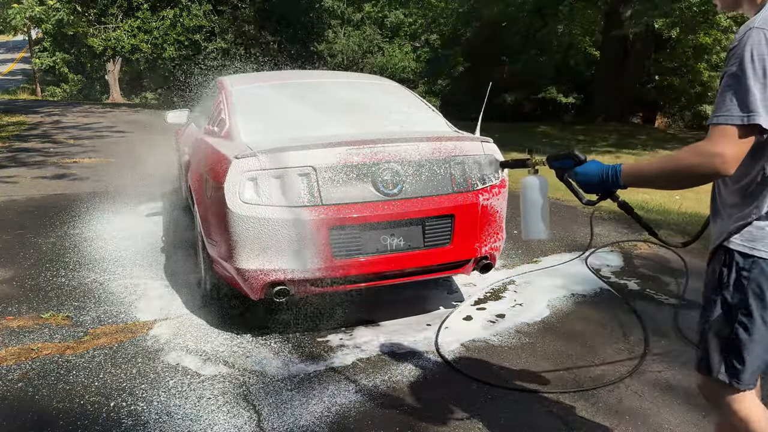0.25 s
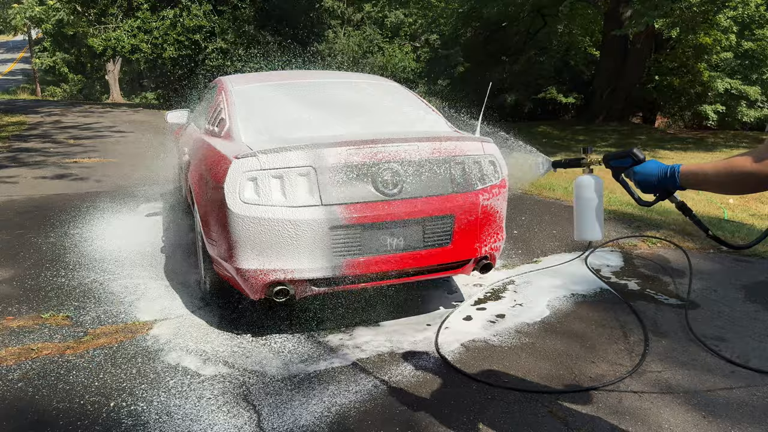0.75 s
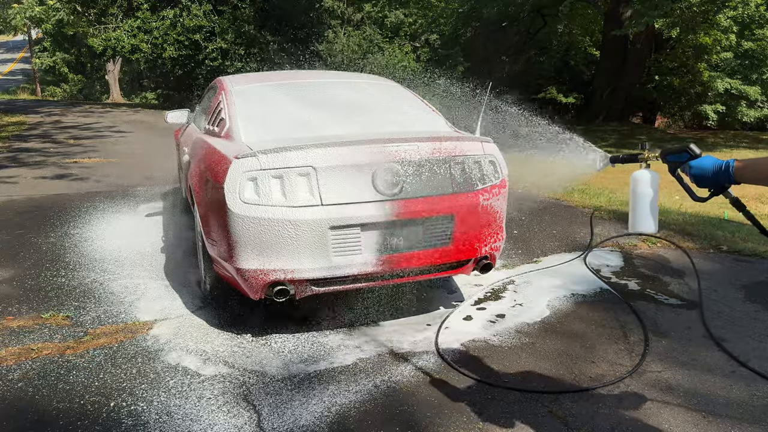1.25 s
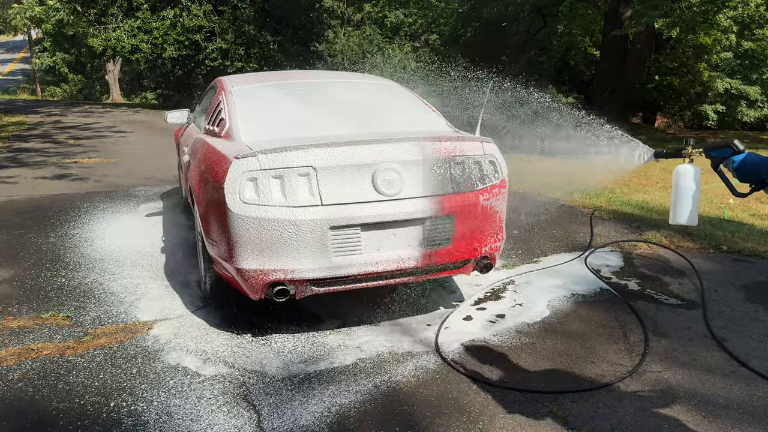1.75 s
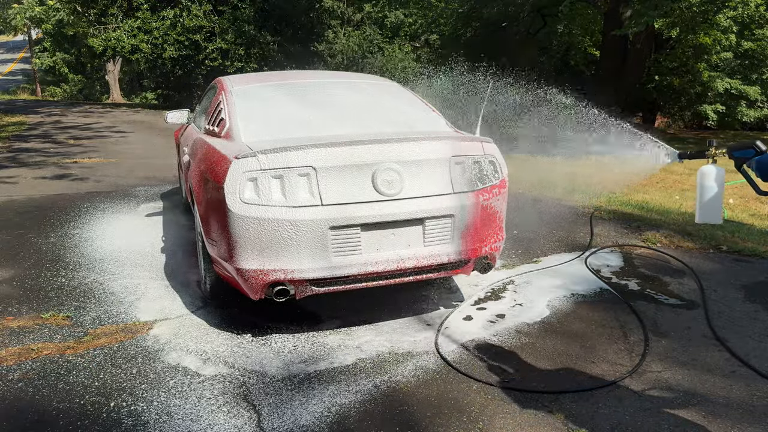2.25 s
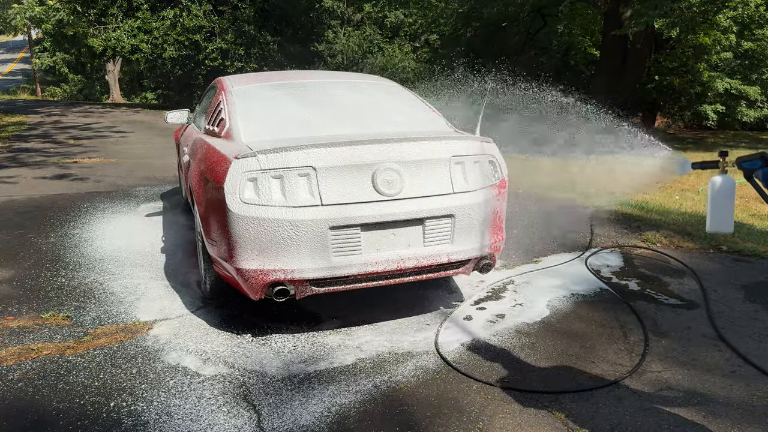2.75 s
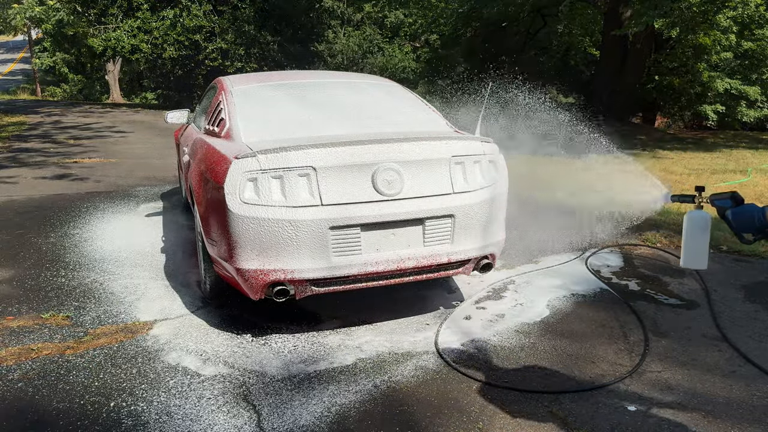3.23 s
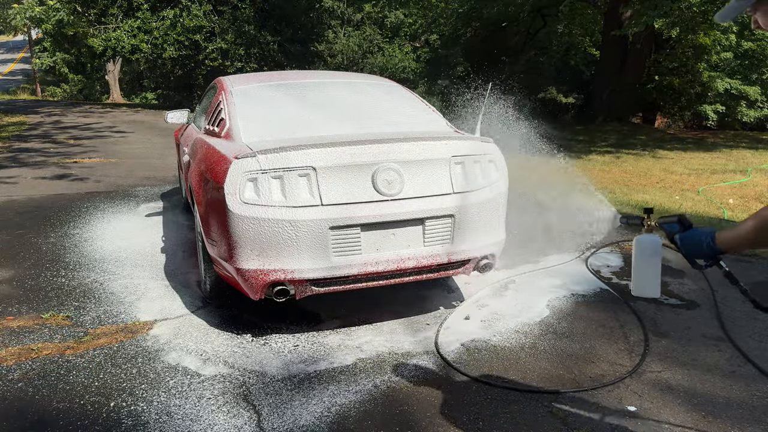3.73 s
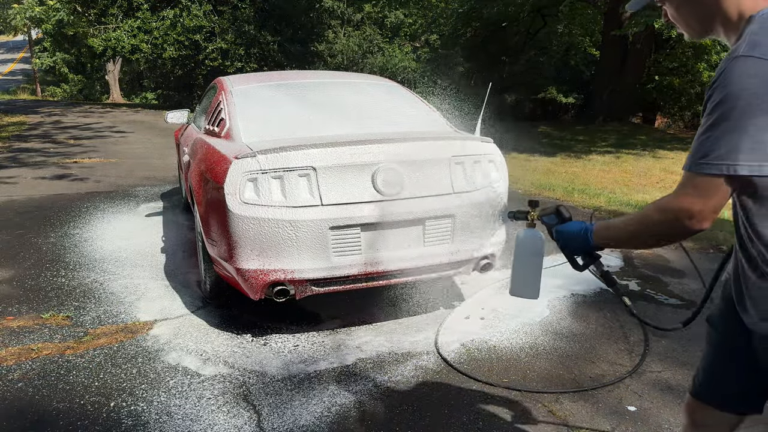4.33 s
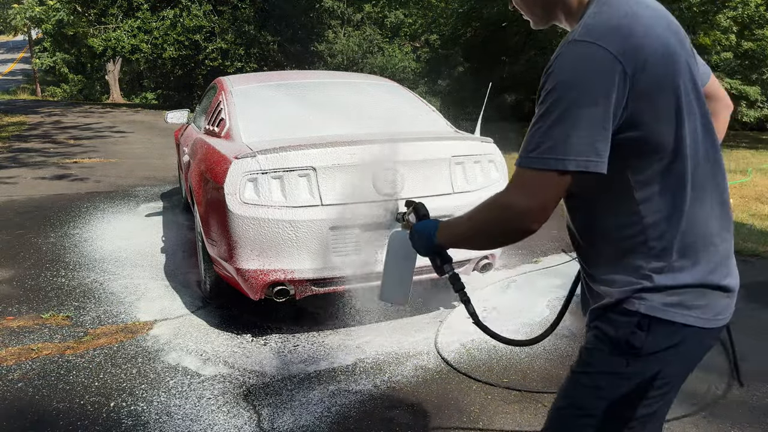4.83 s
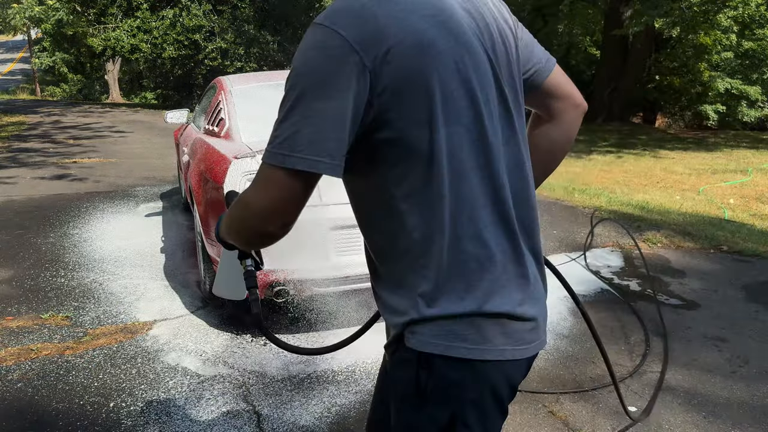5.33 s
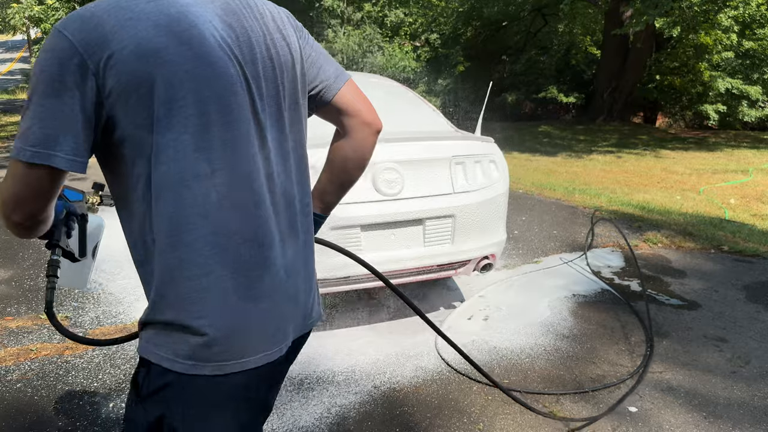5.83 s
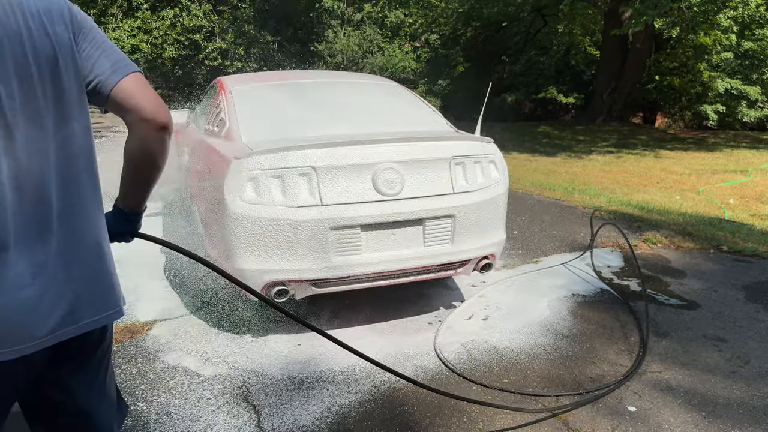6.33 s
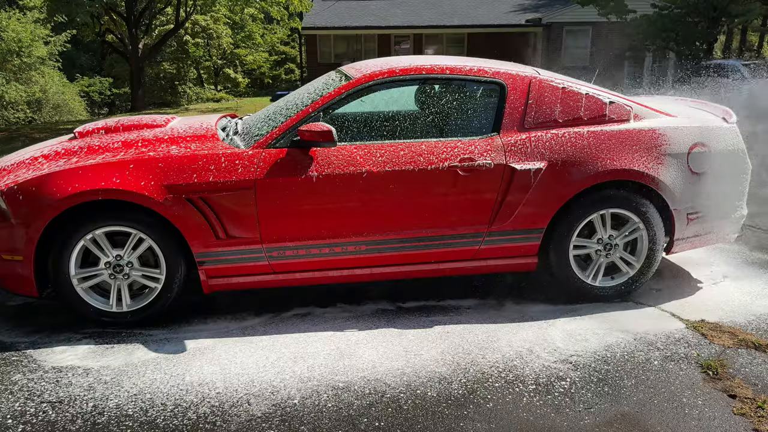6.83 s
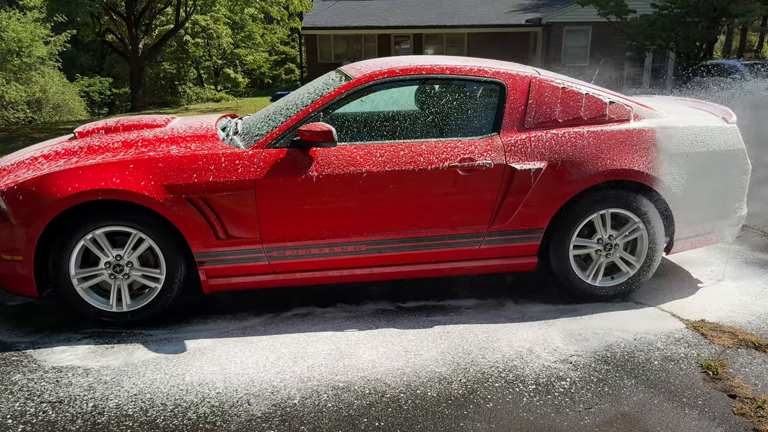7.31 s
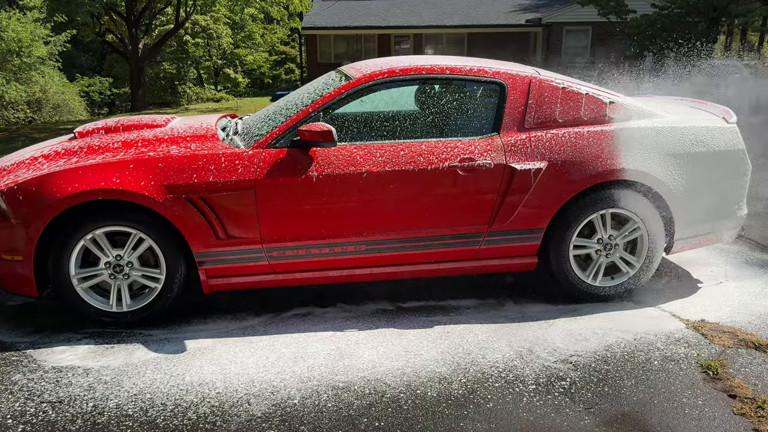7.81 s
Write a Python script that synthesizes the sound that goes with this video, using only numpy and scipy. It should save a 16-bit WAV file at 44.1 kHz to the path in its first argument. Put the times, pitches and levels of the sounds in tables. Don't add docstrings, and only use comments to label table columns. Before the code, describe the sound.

On an open driveway, a foam lance roars and hisses without pause, foam spattering and fizzing on a car's panels. A small petrol pump engine drones and rattles steadily behind. The hiss brightens, then dulls as the operator crosses from right to left past a two-port microphone; rubber hose slaps the ground softly, then the view cuts to a farther spot with a quieter engine and brighter swells of spray.

```python
import sys
import numpy as np
from scipy import signal
from scipy.fft import rfft, irfft, next_fast_len
from scipy.io import wavfile
from scipy.ndimage import uniform_filter1d, map_coordinates

SR = 44100
rng = np.random.default_rng(int(sys.argv[2]) if len(sys.argv) > 2 else 0)


def store_pcm(level_fs):
    pcm = np.round(np.clip(level_fs, -1, 1) * 32767).astype(np.int16)
    wavfile.write(sys.argv[1], SR, np.atleast_2d(pcm).T)


def linear_from_db(decibels):
    return 10 ** (np.asarray(decibels, float) / 20)


N = 355887

JUMP_S = 6.763
FIRING_HZ = 27.94
TOP_HZ = 15850

# (time [s], nozzle to microphone [m])
WALK_M = [(0, 2.27), (.8, 2.27), (2.6, 2.83), (3.45, 3.28), (4.2, 2.58), (4.6, 2.33), (5.15, 2.07),
          (5.7, 2.2), (6.75, 2.74), (6.78, 4.1), (8.07, 3.1)]
# (time [s], extra lead of the right port [microseconds])
BEARING_US = [(0, -58), (.5, -55), (1.3, 0), (1.85, 2), (2.6, 38), (3.7, 15), (4.2, 0), (4.55, -4),
              (5.1, -32)]
# (frequency [Hz], right leads left by [rad])
LEAD_FIRST_RAD = [(0, -0.35), (300, 0.73), (700, 0.53), (1300, 1.2), (2250, .8), (2650, -.8), (4000, -.1),
                  (8000, 0)]


def unit(x):
    return x / np.sqrt(np.mean(x ** 2) + 1e-20)


def along(points, hz):
    f, v = np.transpose(points)
    return np.interp(np.log(hz + 1), np.log(f + 1), v)


def curves(rows):
    s, *cols = np.transpose(rows)
    return [np.interp(np.arange(N) / SR, s, c) for c in cols]


def ramp(start_s, takes_s):
    return ((np.arange(N) / SR - start_s) / takes_s).clip(0, 1)


def wobble(rate):
    knots = rng.standard_normal(int(N * rate / SR) + 4)
    return map_coordinates(knots, [np.arange(N) * rate / SR])


def filtered(x, response):
    m = next_fast_len(N + 8192)
    return irfft(rfft(x, m) * response(np.fft.rfftfreq(m, 1 / SR)), m)[..., :N]


def patchy(patchy_db):
    z = signal.stft(rng.standard_normal(N), nperseg=256)[2]
    field = uniform_filter1d(rng.standard_normal(z.shape), size=5, axis=0)
    field = uniform_filter1d(field, size=12, axis=1)
    return signal.istft(z * linear_from_db(patchy_db * unit(field)), nperseg=256)[1][:N]


def ports(x, lead):
    sides = [-1, 1]
    return filtered(x, lambda hz: np.exp(.5j * np.outer(sides, np.interp(hz, *np.transpose(lead)))))


def lance():
    # (time [s], fan turned to the microphone [dB], jet striking the panels [dB])
    aim = [(0, -0.5, 1.5), (.66, 0, 0), (.94, 2, -0.5), (1.25, 2.5, -2.5), (2.06, 5, -1), (2.88, 1.5, -1.5),
           (3.1, -1.7, -0.5), (3.6, -2, 1.5), (4.4, .5, 1), (5.2, -3, 1.5), (5.4, -2.5, 0), (6, -1.5, 0.5),
           (6.35, 1, 0), (6.74, -0.5, -1), (6.8, -1, 2), (7.03, -0.5, 1), (7.38, 2.5, 0.5),
           (8.07, -0.5, -0.5)]
    # (frequency [Hz], level [dB per Hz])
    roar_tone = [(1200, -36), (1500, -12), (1650, 3.5), (1800, 6), (2000, 3.5), (2300, -1), (2600, -24),
                 (3400, -46)]
    spatter_tone = [(25, -10), (100, 0), (300, 0.5), (600, 0), (1000, 0), (1500, 0), (2500, -7),
                    (4000, -33.5)]
    fizz_tone = [(1500, -6), (2500, 1), (3500, 0), (5000, -3), (6800, -5.5), (7800, -13), (9000, -34)]
    # (level [dB], times spreading loss [dB/dB], times fan [dB/dB],
    # times strike [dB/dB], hidden by the body [dB], second spot [dB])
    roar_law = (-45, 0.23, 0.2, .35, -8, 0.5)
    spatter_law = (-42, -0.07, 0.09, 0.04, -1.5, -3.5)
    fizz_law = (-43, 1.08, 0.22, 1.55, -1, -2.5)
    hiss_law = (-40.5, 1.0, 1.0, 0.0, 0.0, 0.0)

    metres, = curves(WALK_M)
    fan_db, strike_db = curves(aim)
    spreading_db = 20 * np.log10(2.5 / metres)
    hidden = ramp(4.92, 0.85)
    second_spot = np.arange(N) > JUMP_S * SR
    causes = np.array([np.ones(N), spreading_db, fan_db, strike_db, hidden, second_spot])
    roar_db, spatter_db, fizz_db, hiss_db = np.array([roar_law, spatter_law, fizz_law, hiss_law]) @ causes

    diffuse = 0.45 + .005 * np.abs(curves(BEARING_US)[0])
    flutter = wobble(14) + 0.44 * wobble(45)
    pump = np.cos(2 * np.pi * FIRING_HZ * np.arange(N) / SR)
    roar = spray(roar_tone, patchy_db=0.4, depth=1.4, diffuse=0.27 * diffuse)
    roar = linear_from_db(roar_db + .4 * flutter) * roar
    spatter = linear_from_db(spatter_db) * spray(spatter_tone, patchy_db=0.15, depth=0.69, diffuse=.5 * diffuse)
    fizz = spray(fizz_tone, patchy_db=1.5, depth=0.77, diffuse=1.04 * diffuse)
    fizz = linear_from_db(fizz_db + 0.19 * flutter + 0.45 * pump) * fizz
    upper = filtered(fizz, lambda hz: 1 / (1 + (4640 / (hz + 1)) ** 6))
    fizz = fizz + (linear_from_db(0.66 * fan_db - 0.75 * strike_db) - 1) * upper
    fine_hiss = linear_from_db(hiss_db + 0.16 * flutter + .5 * pump) * hiss(fan_db)
    return roar + spatter + fizz + fine_hiss


def spray(spectrum, patchy_db, depth, diffuse):
    # (frequency [Hz], right leads left by [rad])
    lead_second = [(0, 0), (300, 1.0), (700, 1.35), (1400, 2), (2250, 2.1), (2650, 4.4), (4300, 5.2),
                   (7000, 6.3)]

    crossed = ramp(5.2, 0.51)
    lead_samples = curves(BEARING_US)[0] * (1 - crossed) * SR / 1e6
    jet = unit(bounced(patchy(patchy_db), depth))
    direct = np.sqrt(1 - crossed) * ports(jet, LEAD_FIRST_RAD) + np.sqrt(crossed) * ports(jet, lead_second)
    direct = filtered(direct, lambda hz: linear_from_db(along(spectrum, hz)))
    direct = np.array([map_coordinates(port, [np.arange(N) + side * lead_samples], mode='nearest')
                       for port, side in zip(direct, (-.5, .5))])

    scattered = filtered(rng.standard_normal((2, N)),
                         lambda hz: linear_from_db(along(spectrum, hz)) * hz / (hz + 250))
    share = (diffuse * (1 + .15 * crossed)).clip(0, 1)
    return np.sqrt(1 - share) * unit(direct) + np.sqrt(share) * unit(scattered)


def bounced(x, depth):
    metres, = curves(WALK_M)
    height_m, sound_m_s = 1.3, 343
    delay_s = (np.hypot(metres, 2 * height_m) - metres) / sound_m_s

    def later(trips):
        return np.interp(np.arange(N) - trips * delay_s * SR, np.arange(N), x)

    echo = depth * .49
    return x + echo * later(1) + .7 * echo ** 2 * later(2) + .4 * echo ** 3 * later(3)


def hiss(fan_db):
    # (frequency [Hz], level [dB per Hz])
    hiss_tone = [(6500, -29.5), (7500, -12.5), (8500, -7.5), (9900, -4), (11000, -6.5), (12000, -10),
                 (13500, -5), (15600, -0.5)]
    # (time [s], half length [s], share of lower hiss in step [0-1])
    swings = [
        (7.244, 0.047, .75),
        (7.435, 0.06, 1.2),
        (7.88, 0.097, 1.2),
    ]

    def colour(hz):
        return linear_from_db(along(hiss_tone, hz)) * (hz < TOP_HZ)

    t = np.arange(N) / SR
    droplets = patchy(patchy_db=1.0) * linear_from_db(wobble(400))
    fine = unit(filtered(droplets, colour))
    top_db = -.3 * fan_db - 1.5 * (t > JUMP_S) + 3 * ramp(7.85, 0.087)
    top = filtered(fine, lambda hz: 1 / (1 + (12800 / (hz + 1)) ** 12))
    fine = fine + (linear_from_db(top_db) - 1) * top

    turning = [(8116 + k * 2993, 2 * np.pi * k) for k in (-3, 1, 3)]
    square = 0.085 + sum(share * np.exp(-((t - s) / half_s) ** 4) for s, half_s, share in swings)
    square = square.clip(0, 1)
    direct = (1 - square) * ports(fine, turning) + square * ports(fine, turning[1:])

    mist = unit(filtered(rng.standard_normal((2, N)),
                         lambda hz: colour(hz) * (0.35 + 1 / (1 + (hz / 8600) ** 20))))
    return direct + linear_from_db(-3.5 + 2.2 * wobble(6.0)) * 0.51 * mist


def hose():
    # (time [s], peak level [dB], pitch [Hz])
    slap_events = [
        (5.565, -31, 480),
        (5.587, -33, 567),
        (5.64, -31, 590),
    ]
    slaps = np.zeros(N)
    t = np.arange(SR // 20) / SR
    for s, db, hz in slap_events:
        envelope = linear_from_db(db - 60 * t / 0.023) * (1 - np.exp(-t / 0.0035))
        slaps[round(s * SR):][:len(t)] += envelope * np.sin(2 * np.pi * hz * t) * 2
    return slaps


def causal_pulse(orders, lag, size=8192):
    hz = np.fft.rfftfreq(size, 1 / SR)
    multiple, db = np.transpose([(0, -60), *orders, (orders[-1][0] + 6, -60)])
    cepstrum = irfft(np.log(linear_from_db(np.interp(hz / FIRING_HZ, multiple, db))))
    cepstrum[1:size // 2] *= 2
    cepstrum[size // 2 + 1:] = 0
    held = np.cumsum(along(lag, hz) / 1000 + 1 / FIRING_HZ) * SR / size
    return irfft(np.exp(rfft(cepstrum) - 2j * np.pi * held))


def engine():
    # (multiple of the firing rate [1], level [dB])
    near_orders = [(1, -76), (2, 4.5), (3, -10.5), (4, -6), (5, 2.5), (6, -9.5), (7, -10), (8, 0.5),
                   (9, -4.5), (10, -2.5), (11, -7.5), (12, -62), (13, -7.5), (14, -14.5), (15, -15),
                   (16, -23.5), (17, -15), (18, -56), (19, -27.5), (20, -20), (21, -51), (22, -20.5)]
    far_orders = [(1, -39), (2, 7.5), (3, -9.5), (4, -4), (5, 3), (6, -9), (7, -13), (8, -5.5), (9, -3),
                  (10, -3.5), (11, -5), (12, -36.5), (13, -23), (14, -8.5), (15, -34), (16, -40),
                  (17, -12.5), (18, -22), (19, -16), (20, -14.5), (21, -49), (22, -12)]
    # (frequency [Hz], lag [ms])
    near_lag = [(60, 7), (126, 10.5), (165, 20), (210, -1), (237, 0), (265, 16), (293, -9.5), (330, 4)]
    far_lag = [(70, 14), (98, 3), (126, 17), (154, 31), (182, 20), (237, -9), (265, 7), (300, 0)]
    # (frequency [Hz], level [dB per Hz])
    clatter = [(250, -48), (450, -1), (800, 7.5), (2000, 7.5), (6000, -7), (12000, -5)]

    turns = np.cumsum(FIRING_HZ * (1 + .002 * wobble(3)) / SR)
    firings = np.diff(np.floor(turns), prepend=0)
    uneven = filtered(firings * rng.standard_normal(N), lambda hz: 1 / (1 + (190 / (hz + 1)) ** 4))
    drive = firings * linear_from_db(0.067 * wobble(26)) + 0.12 * uneven
    lead_in = np.ptp(np.flatnonzero(firings)[:9])
    drive = np.r_[drive[:lead_in], drive]

    def note(orders, lag):
        return unit(signal.fftconvolve(drive, causal_pulse(orders, lag))[len(drive) - N:len(drive)])

    far = np.arange(N) > JUMP_S * SR
    exhaust = np.where(far, note(far_orders, far_lag), note(near_orders, near_lag))
    gate = np.exp(2.1 * np.cos(2 * np.pi * turns - .8) + .5 * np.cos(4 * np.pi * turns))
    rattle = unit(gate * filtered(rng.standard_normal(N), lambda hz: linear_from_db(along(clatter, hz))))
    level_db = np.where(far, -42.3, -35.5)
    return linear_from_db(level_db) * ports(exhaust + linear_from_db(-19.5) * rattle, LEAD_FIRST_RAD)


def scene():
    return lance() + hose() + engine()


def low_pass(x):
    return signal.sosfilt(signal.butter(12, 16300, fs=SR, output="sos"), x)


def record(dry):
    # (frequency [Hz], left minus right [dB])
    tilt = [(200, 0), (700, -2.5), (1400, -2.5), (2100, -2), (3100, 2.5), (5000, 1), (7200, 1.5), (8500, 0)]

    def shading(hz):
        return linear_from_db(np.outer([.5, -.5], along(tilt, hz) * (hz > 150))) * (hz < TOP_HZ)

    return low_pass(filtered(dry, shading))


dry = scene()
out = record(dry)
store_pcm(out)
```